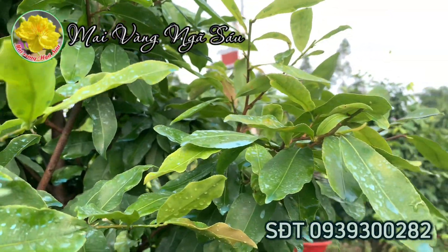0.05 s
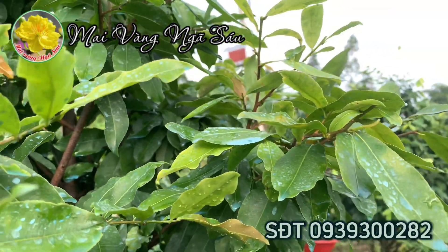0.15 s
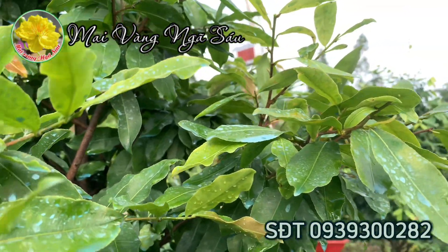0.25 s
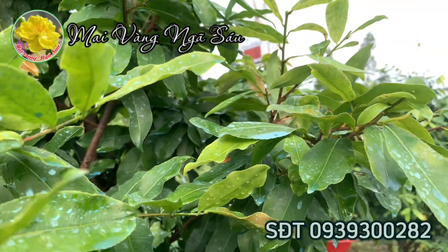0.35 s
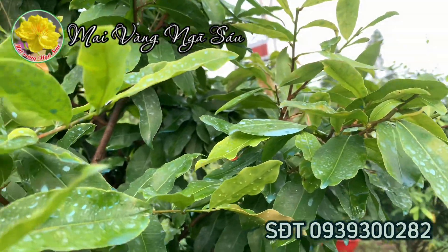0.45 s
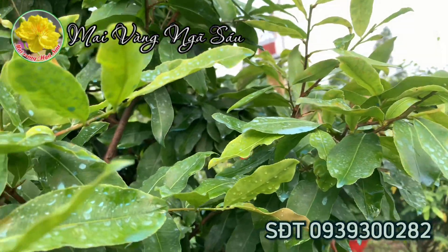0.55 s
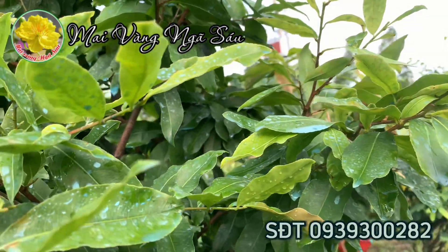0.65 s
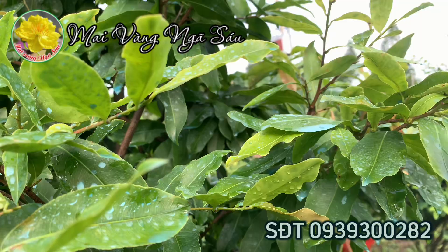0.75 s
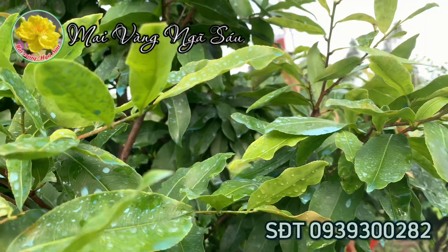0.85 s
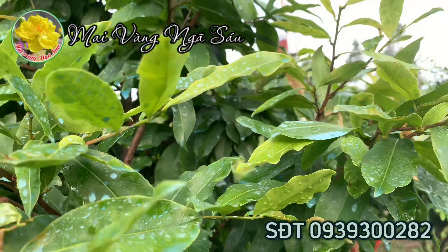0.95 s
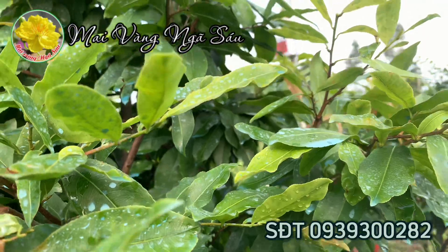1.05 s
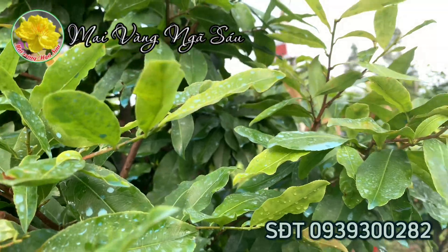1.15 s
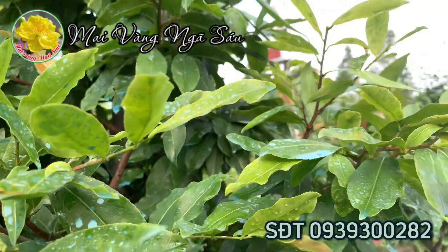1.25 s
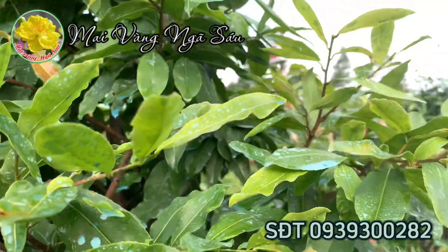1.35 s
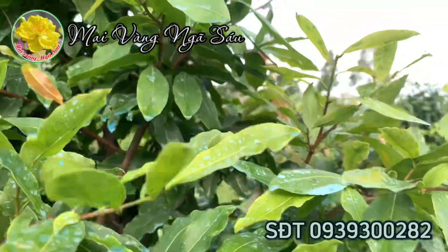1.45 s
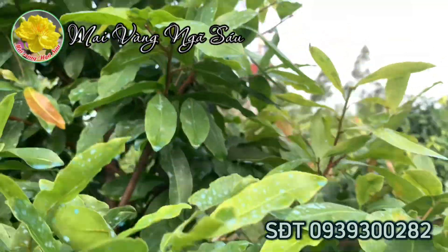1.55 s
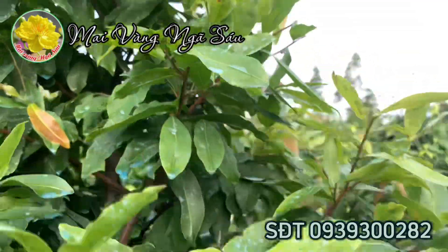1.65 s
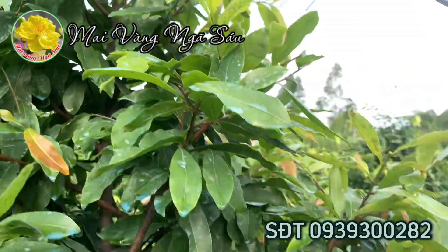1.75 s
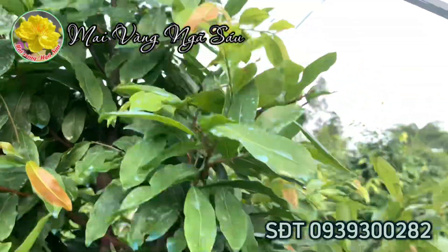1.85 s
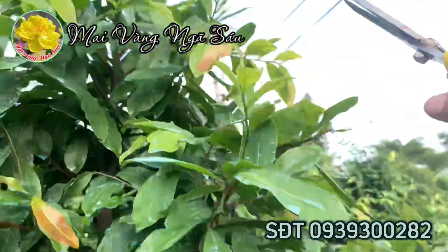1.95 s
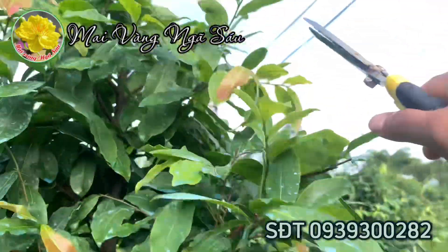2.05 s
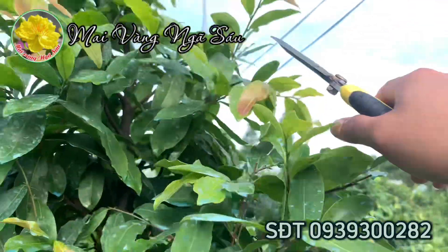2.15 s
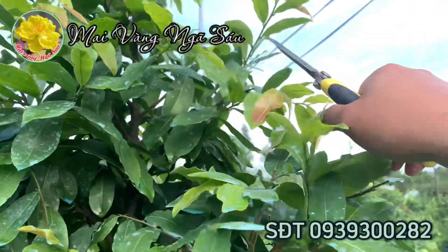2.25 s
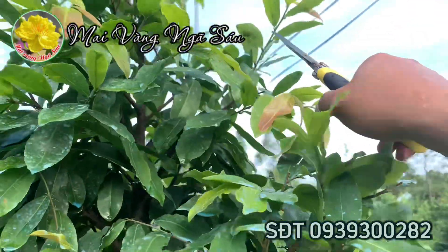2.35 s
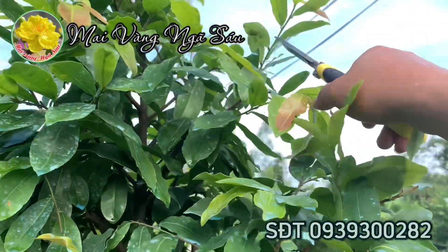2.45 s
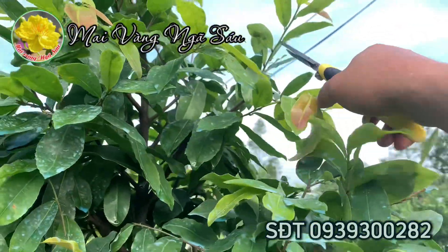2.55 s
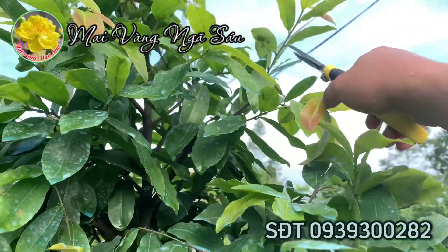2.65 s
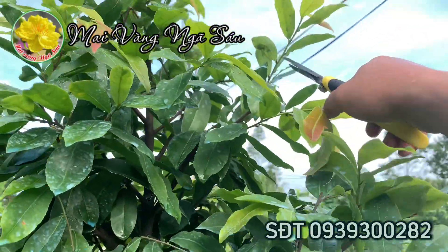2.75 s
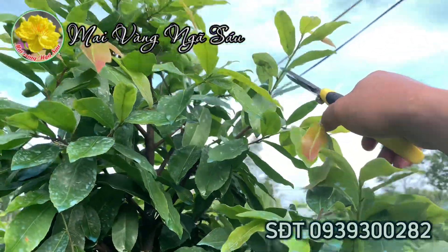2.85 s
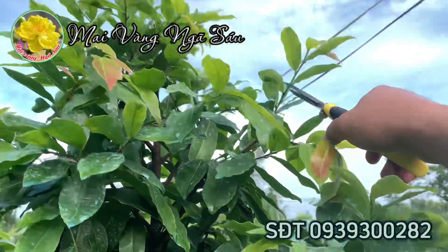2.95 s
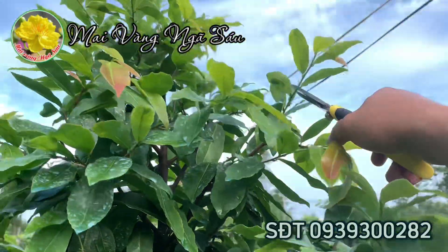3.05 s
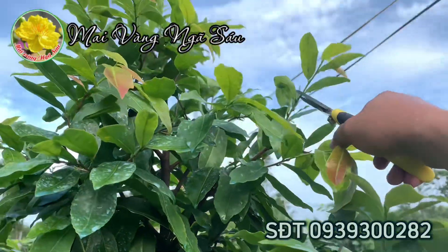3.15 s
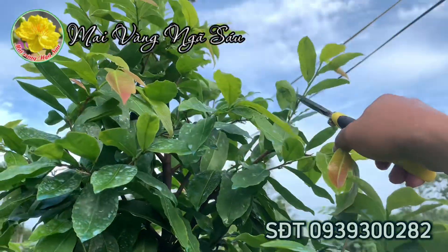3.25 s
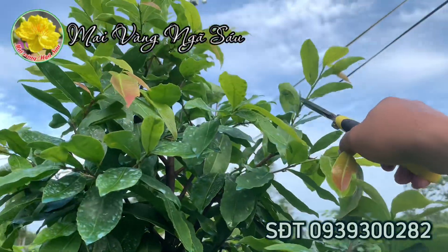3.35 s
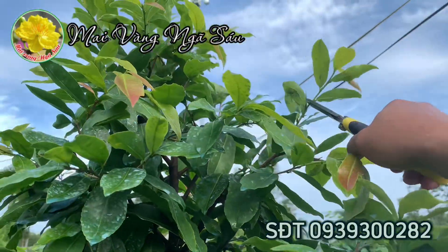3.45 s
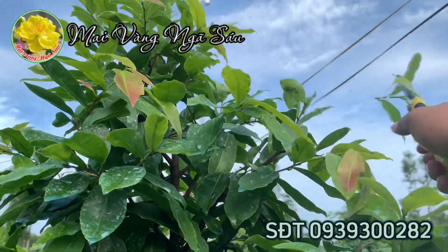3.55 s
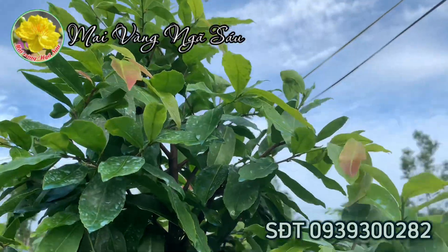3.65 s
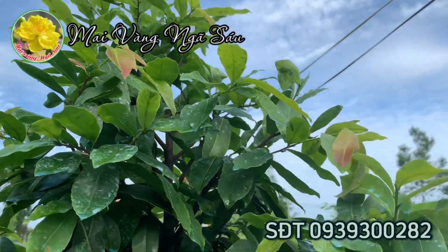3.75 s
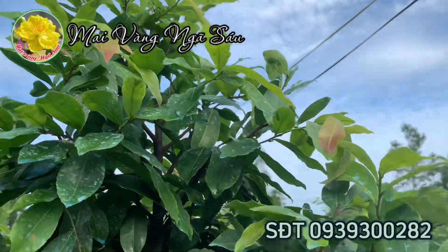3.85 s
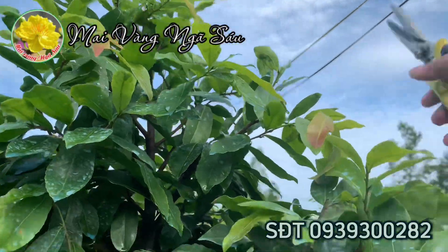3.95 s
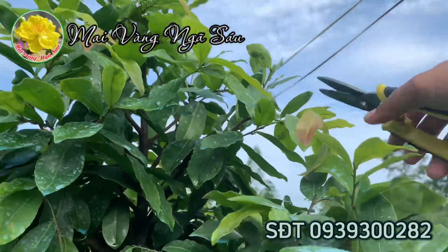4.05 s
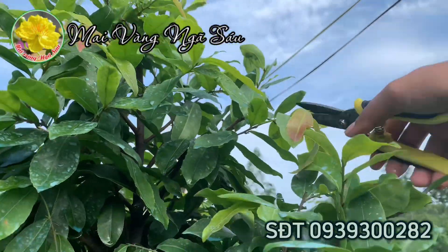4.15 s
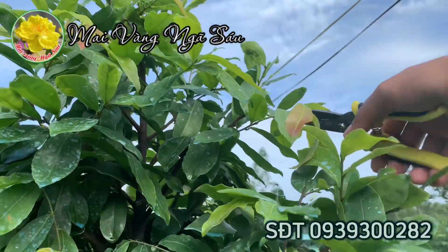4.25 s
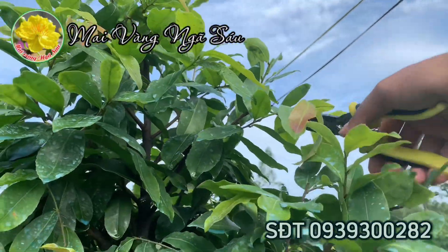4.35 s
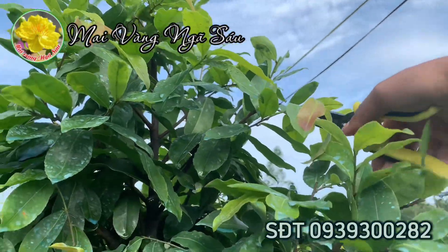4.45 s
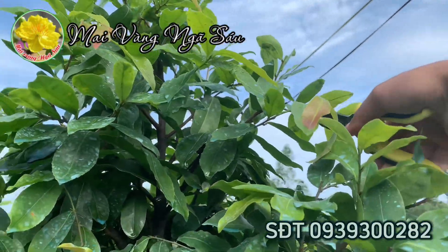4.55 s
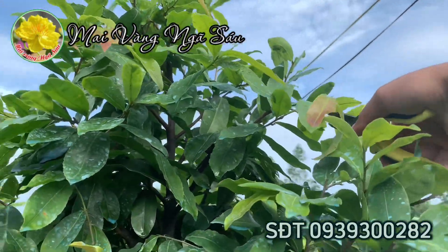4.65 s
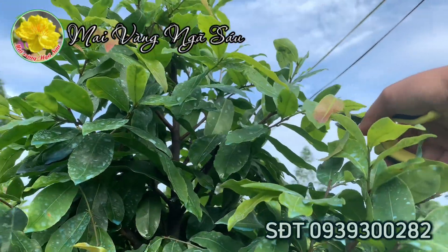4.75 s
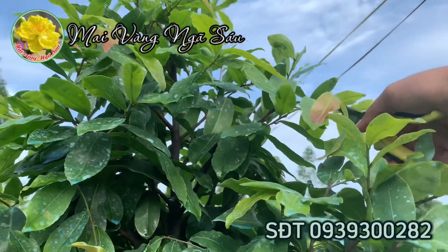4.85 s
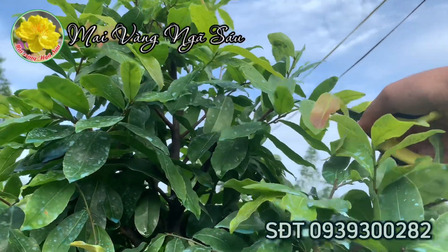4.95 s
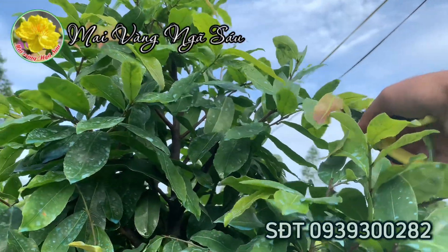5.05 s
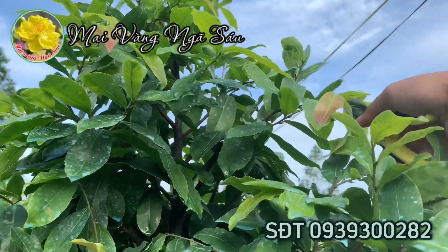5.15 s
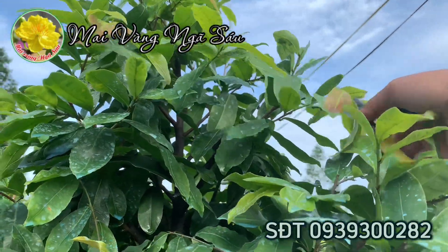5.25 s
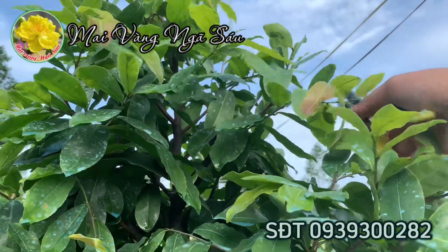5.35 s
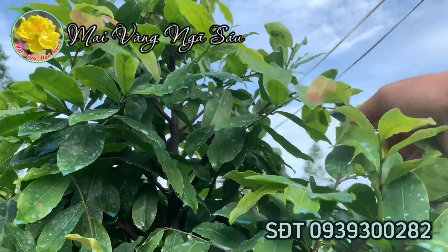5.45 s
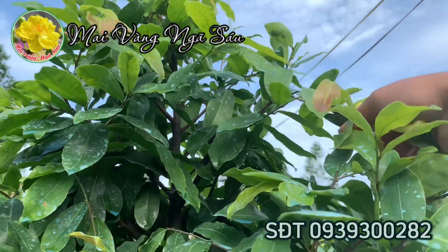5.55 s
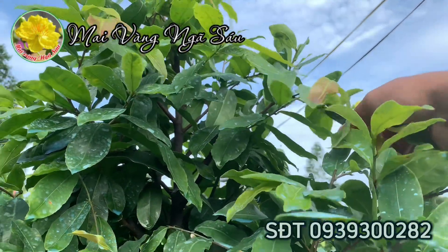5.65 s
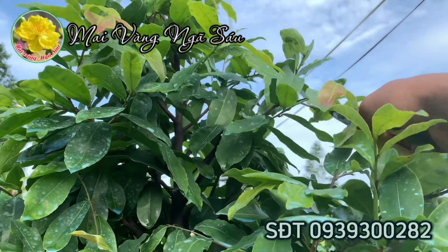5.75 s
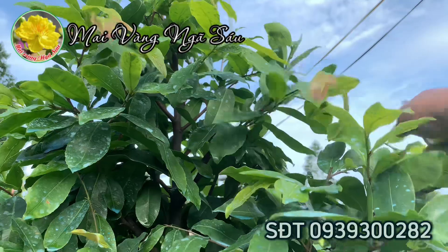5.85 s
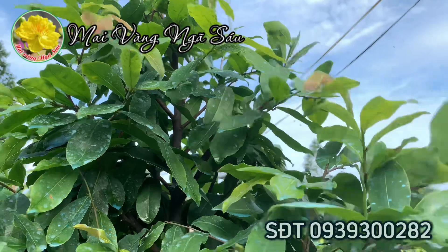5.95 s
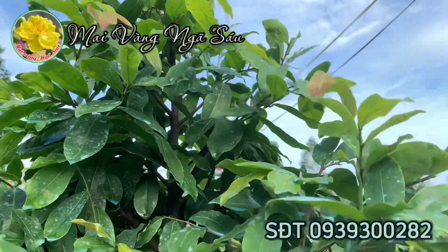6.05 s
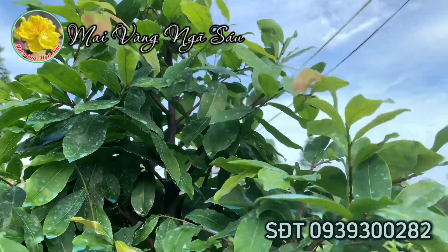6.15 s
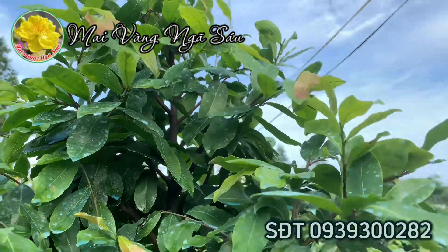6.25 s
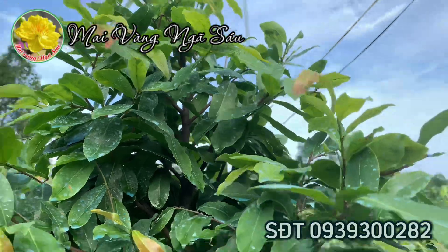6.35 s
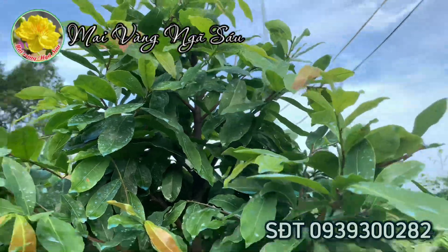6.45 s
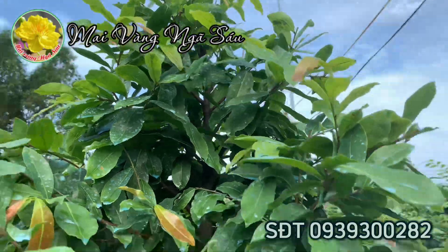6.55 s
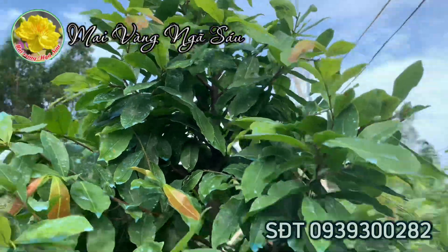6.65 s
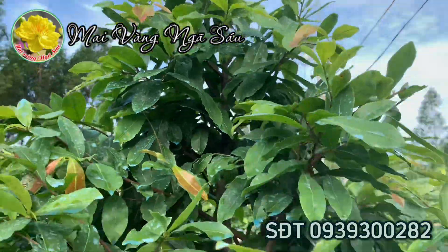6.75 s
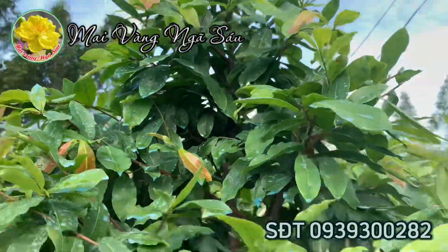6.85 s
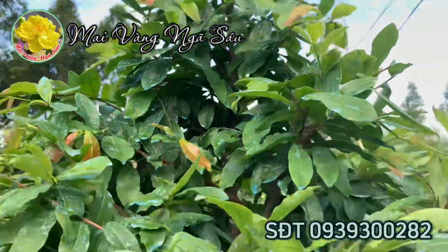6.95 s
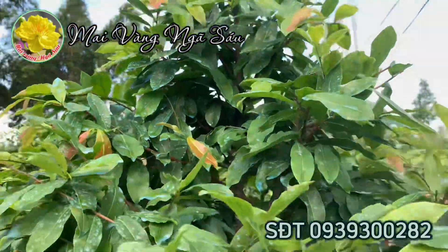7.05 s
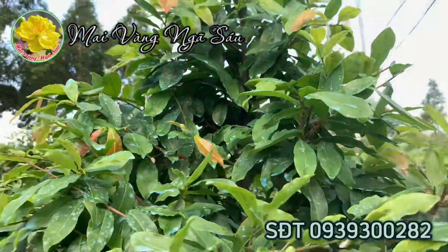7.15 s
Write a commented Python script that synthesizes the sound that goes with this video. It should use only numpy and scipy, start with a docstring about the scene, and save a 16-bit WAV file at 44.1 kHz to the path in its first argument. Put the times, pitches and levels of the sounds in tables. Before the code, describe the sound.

Outdoor garden pruning: crisp snips, rustling leaves, a hand rubbing and bumping the camera, over a steady throbbing cicada chirr and low rumble.

```python
"""Pruning scissors snip shoot tips off a garden tree, close to a hand-held camera: each cut is a set of
noise bursts for crush, snap and click, with ringing blade modes and a knock in the hand.
Leaves rustle as clumped grains; a hand rubs (stick-slip grains through case resonances) and bumps the camera.
A cicada chirrs as throbbing partials and a second insect buzzes evenly at first, over shaped noise for
far insects, air and low rumble, a faint far whine and a sinking whirr."""
import sys
import numpy as np
from scipy import signal
from scipy.fft import rfft, irfft
from scipy.io import wavfile
from scipy.ndimage import map_coordinates

SR = 44100
rng = np.random.default_rng(int(sys.argv[2]) if len(sys.argv) > 2 else 0)


def inscribe(sig):
    """Save sig as 16-bit PCM at rate SR to the path in sys.argv[1].

    A 1-D sig is mono; a 2-D sig holds one channel per row.
    Samples are clipped to [-1, 1] before scaling.
    """
    pcm = np.round(np.clip(np.atleast_2d(sig).T, -1, 1) * 32767)
    wavfile.write(sys.argv[1], SR, pcm.astype(np.int16))


N = 316638
T = np.arange(N) / SR
HZ = np.fft.rfftfreq(N, 1 / SR)


def gain_of(db):
    """Decibels to amplitude."""
    return 10 ** (np.asarray(db) / 20)


def evened(x):
    """Scales to rms 1."""
    return x / np.sqrt(np.mean(x ** 2) + 1e-20)


def read(points, hz=HZ):
    """Reads a spectrum table on a log-frequency axis."""
    f, value = np.transpose(points)
    return np.interp(np.log(hz + 1), np.log(f + 1), value)


def curve(rows, count=1):
    """One column of a time table, at every sample."""
    rows = np.asarray(rows)
    return np.interp(T, rows[:, 0], rows[:, count])


def stroke(rows):
    """Gain of a level table, silent outside its span."""
    inside = (T > rows[0][0]) * (T < rows[-1][0])
    return gain_of(curve(rows)) * inside


def swell(middle, length):
    """A rounded swell of height 1."""
    return np.exp(-2 * ((T - middle) / length) ** 2)


def gate(start, end, attack, release):
    """Attack, hold and release between two times."""
    return np.clip(np.minimum((T - start) / attack, (end - T) / release), 0, 1)


def add(mix, s, sound):
    """Mixes a sound in at time s."""
    part = mix[max(round(s * SR), 0):][:len(sound)]
    part += sound[:len(part)]


def drift(hz):
    """Slow random wander of rms 1, up to about hz."""
    return evened(irfft(rfft(rng.standard_normal(N)) / (1 + (HZ / hz) ** 4), N))


def waver(x, share, hz):
    """Lets the pitch of a steady noise wander by a small share."""
    position = np.cumsum(1 + share * drift(hz))
    return map_coordinates(x, [position], order=3, mode="wrap")


def colour(x, spectrum, size=2048):
    """Causal (minimum-phase) filter of unit energy with the given spectrum."""
    log_gain = np.log(gain_of(read(spectrum, abs(np.fft.fftfreq(size, 1 / SR)))))
    taps = np.fft.ifft(np.exp(np.conj(signal.hilbert(log_gain)))).real
    return signal.oaconvolve(x, taps / np.linalg.norm(taps))[:N]


def grains(per_s, spread_db):
    """Random tiny clicks of either sign and scattered size."""
    size = gain_of(spread_db * np.minimum(rng.exponential(1, N), 4))
    present = rng.random(N) < per_s / SR
    return evened(size * rng.choice([-1, 1], N) * present)


def burst(rise, decay, size=4096):
    """A cluster of sharp cracks: white, swelling and dying within milliseconds."""
    t = np.arange(size) / SR
    shape = (1 - np.exp(-(t / rise) ** 2)) * np.exp(-t / decay)
    x = shape * rng.standard_normal(size)
    for _ in range(3):  # every crack is sharp, so flatten the spectrum
        x = irfft(np.exp(1j * np.angle(rfft(x)))) * np.sqrt(shape)
    return evened(x) * np.sqrt(np.mean(shape ** 2))


def thud(hz, decay):
    """A soft, damp thing struck once: its wobbling phase leaves no clean pitch."""
    t = np.arange(SR // 2) / SR
    wobble = t + np.cumsum(0.097 * drift(770)[:len(t)]) / SR
    onset = 1 - np.exp(-3 * t * hz)
    return -np.sin(2 * np.pi * hz * wobble) * onset * np.exp(-t / decay)


# how alike diffuse sound is at the two ports: f/Hz, correlation/1
PORT_LIKENESS = [(60, .84), (280, .84), (700, .5), (1400, .3), (3000, .4), (6800, .55), (8200, .98)]


def diffuse(spectrum_db):
    """Noise from all around, partly alike at the two ports."""
    a, b = rfft(rng.standard_normal((2, N)))
    same = np.clip(read(PORT_LIKENESS), 0, 1)
    other = same * a + np.sqrt(1 - same ** 2) * b
    return evened(irfft(np.array([a, other]) * gain_of(spectrum_db), N))


# spectra of far insects, open air and low rumble: f/Hz, level/dB
CHORUS_SPECTRUM = [(4800, -30.5), (5400, -7.5), (5900, 0), (6450, 3), (6950, 7), (7400, 7.5), (7570, -4),
                   (7750, -54), (8500, -80.5)]
AIR_SPECTRUM = [(60, 1.5), (200, -1.5), (290, 4.5), (380, 2.5), (600, -4.5), (900, -7), (1300, -13),
                (2000, -18.5), (3200, -24.5), (5000, -25), (8000, -81.5), (15000, -50.5)]
RUMBLE_SPECTRUM = [(22, -54), (36, -20.5), (51, 4.5), (72, -2.5), (100, -1.5), (128, -2), (155, -5),
                   (185, -16), (300, -46), (1000, -90)]
# a far machine whine that comes and goes: start t/s, end t/s, level/dB
WHINE_SPELLS = [(2.04, 2.6, -67.5), (2.8, 3.4, -66), (3.66, 4.48, -66.5), (4.7, 5.15, -71),
                (6.58, 7.08, -67)]
# a faint far whirr that sinks: t/s, level/dB, f/Hz
WHIRR_PATH = [(.5, -76, 2126), (1.1, -71.5, 2035), (2.0, -72, 1762), (2.6, -73, 1775)]
CHORUS_DB, AIR_DB, RUMBLE_DB = -60, -58.5, -47.5
CHORUS_FOLLOW = 0.25  # share of the near cicada's swells (in dB) that the chorus joins in
LULL_S, LULL_LENGTH_S, AIR_LULL_DB, RUMBLE_LULL_DB = 6.14, 0.77, -8, -3.5
# the upper part of the rumble, a drone that slowly recedes
DRONE_HZ, DRONE_DB, DRONE_FADE_DB_PER_S = 100, 3, 0.87
WHINE_HZ, WHINE_WIDTH_HZ, WHINE_FADE_S, WHINE_FLOOR_DB = 1012, 15, 0.14, -79


def outdoors():
    """Shaped noise for far insects, air, rumble and a thin whine; a fluttering tone for the whirr."""
    effort_db = (curve(CICADA_LEVELS, count=1) + curve(CICADA_LEVELS, count=2)) / 2
    follow_db = CHORUS_FOLLOW * (effort_db - effort_db.mean())
    chorus = diffuse(read(CHORUS_SPECTRUM)) * gain_of(CHORUS_DB + follow_db + drift(23))

    lull = swell(LULL_S, LULL_LENGTH_S)
    air = diffuse(read(AIR_SPECTRUM)) * gain_of(AIR_DB + AIR_LULL_DB * lull + 1.44 * drift(21))
    rumble_db = RUMBLE_DB + RUMBLE_LULL_DB * lull + 0.21 * drift(3.8)
    rumble = diffuse(read(RUMBLE_SPECTRUM)) * gain_of(rumble_db)
    drone = irfft(rfft(rumble) / (1 + (DRONE_HZ / (HZ + 1)) ** 8), N)
    rumble = rumble - drone + drone * gain_of(DRONE_DB - DRONE_FADE_DB_PER_S * T)

    running = sum(gain_of(db) * gate(on, off, WHINE_FADE_S, WHINE_FADE_S) for on, off, db in WHINE_SPELLS)
    whine_band_db = -20 * np.log10(1 + ((HZ - WHINE_HZ) / WHINE_WIDTH_HZ) ** 2)
    whine = diffuse(whine_band_db) * (running + gain_of(WHINE_FLOOR_DB))

    flutter = evened(drift(40) + drift(390))
    whirr_phase = 2 * np.pi * np.cumsum(curve(WHIRR_PATH, count=2)) / SR
    whirr = stroke(WHIRR_PATH) * flutter * np.cos(whirr_phase)
    return chorus + air + rumble + whine + whirr


# leaf spectrum: f/Hz, level/dB (per Hz)
LEAF_SPECTRUM = [(500, 4), (1900, -2), (3200, -6.5), (5000, -3.5), (7000, -40), (8800, 2), (11000, 1),
                 (12800, 7), (14300, -6.5), (15000, -34)]
# brushes through the leaves, each a rounded swell: middle t/s, length/s, rustle level/dB, hiss level/dB
LEAF_BRUSHES = [(0.51, 0.13, -61, -63), (1.577, 0.17, -63.5, -69), (1.8, 0.2, -60.5, -65),
                (1.949, 0.11, -54, -59), (2.046, 0.027, -54.5, -58), (2.128, 0.2, -56.5, -57.5),
                (2.3, 0.14, -63, -60.5), (2.487, 0.17, -62, -57.5), (2.596, 0.062, -60, -60),
                (3.509, 0.081, -58, -61), (4.526, 0.33, -69, -64.5), (4.878, 0.29, -63.5, -64.5),
                (5.287, 0.07, -53.5, -60.5), (5.683, 0.016, -53, -52), (5.86, 0.21, -51, -55),
                (6.134, 1, -61, -65), (6.534, 0.26, -54.5, -65), (6.663, 0.17, -62, -63),
                (6.948, 0.087, -58, -52), (7.087, 0.38, -58, -63)]
# small ticks among leaves and blades: t/s, level/dB
SMALL_TICKS = [(4.357, -45), (4.445, -43), (4.916, -50), (5.515, -48), (6.904, -45.5), (6.9362, -52),
               (6.961, -42)]
STIR_DB = -74  # leaves stirring all the time
LEAF_SPLIT_HZ = 8400  # rustle below, hiss above


def foliage():
    """Leaves brush in clumps of fine grains, a low rustle and a high hiss; small ticks are short bursts."""
    rustle_power = hiss_power = gain_of(STIR_DB) ** 2
    for s, length, rustle_db, hiss_db in LEAF_BRUSHES:
        shape = swell(s, length)
        rustle_power = rustle_power + (gain_of(rustle_db) * shape) ** 2
        hiss_power = hiss_power + (gain_of(hiss_db) * shape) ** 2
    ticks = np.zeros(N)
    for s, db in SMALL_TICKS:
        add(ticks, s - .002, gain_of(db) * burst(rise=.0012, decay=.006))
    ticks = signal.lfilter([1, -.6], [1], ticks)  # a tick is thinner than a brush
    clumps = gain_of(2.7 * drift(23))
    brush = colour(clumps * grains(per_s=3000, spread_db=-0.5), LEAF_SPECTRUM)
    low = irfft(rfft(brush) * (HZ < LEAF_SPLIT_HZ), N)
    high = brush - low
    return colour(ticks, LEAF_SPECTRUM) + np.sqrt(rustle_power) * low + np.sqrt(hiss_power) * high


# the near cicada: t/s, 10th partial level/dB, 11th partial level/dB
CICADA_LEVELS = [(0.0, -67, -77), (0.4, -85, -64), (0.52, -63.5, -55.5), (0.82, -62, -65),
                 (1.25, -62.5, -56.5), (1.5, -63.5, -63.5), (1.67, -58, -61), (2.03, -48.5, -62),
                 (2.25, -59, -59.5), (2.55, -55, -58.5), (3.15, -58, -69.5), (3.6, -52, -53),
                 (3.88, -53, -50), (4.08, -59.5, -56), (4.45, -59, -65.5), (4.8, -61, -63),
                 (5.48, -55, -68.5), (5.72, -61, -63), (6.08, -52, -60), (6.35, -56, -56.5),
                 (6.6, -55.5, -51), (6.7, -58.5, -65.5), (6.87, -53, -64), (7.18, -63, -59.5)]
# click rate of its tymbal: t/s, f/Hz
TYMBAL_RATE = [(0, 596.3), (2, 606.5), (4.5, 607.8), (7.18, 610.7)]
# its weaker partials: multiple of the click rate/1, level/dB (re the 10th if below it, else the 11th)
WEAK_PARTIALS = [(9, -17.5), (12, -19.5), (15, -23), (16, -22.5), (17, -18)]
# its lowest partial comes forward: middle t/s, length/s, added level/dB
FORWARD_SWELLS = [(0.715, 0.2, 10), (2.172, 0.12, 12)]
WAVER_DB, WAVER_HZ = 0.9, 7


def cicada(throb_hz=23.46, swing=0.0035, throb_db=3.0):
    """Tymbal clicks merge into partials; their rate throbs, and their strength follows a quarter cycle later."""
    beat = 2 * np.pi * np.cumsum(throb_hz * (1 + 0.0465 * drift(5.66))) / SR
    rate_sway = 1 + swing * np.cos(beat) + 0.0012 * drift(104) + .001 * drift(4.97)
    phase = 2 * np.pi * np.cumsum(curve(TYMBAL_RATE) * rate_sway) / SR
    low_db, high_db = (curve(CICADA_LEVELS, count=k) + WAVER_DB * drift(WAVER_HZ) for k in (1, 2))
    song = gain_of(low_db) * np.cos(10 * phase) + gain_of(high_db) * np.cos(11 * phase)
    forward_db = sum(db * swell(s, length) for s, length, db in FORWARD_SWELLS)
    for k, db in WEAK_PARTIALS:
        main_db = low_db + forward_db if k < 10 else high_db
        song += gain_of(db + main_db) * np.cos(k * phase)
    depth_db = throb_db * (1 + .3 * drift(4))
    return np.sqrt(2) * song * gain_of(depth_db * np.sin(beat) + .9 * drift(50))


# the small body that shapes the second insect's pulses: f/Hz, level/dB
BUZZ_SPECTRUM = [(3200, -42), (3750, -30), (4250, -40), (5200, -33), (5430, -9), (5590, -21), (5750, -11),
                 (6050, -2), (6350, -6), (6520, -1), (6800, -4), (7100, -8), (8000, -45), (9600, -34),
                 (10100, -9), (10500, -36)]
# it holds its level, then dies away
BUZZ_DB, BUZZ_HOLD_S, BUZZ_FADE_DB_PER_S, BUZZ_END_S, BUZZ_RELEASE_S = -52.5, 0.23, 16, 0.68, 0.11
# its resonance glides up
BUZZ_RING_HZ, BUZZ_GLIDE_HZ_PER_S, BUZZ_RING_WIDTH_HZ, BUZZ_RING_DB = 5800, 2300, 380, 7


def buzzer():
    """Harmonics of an even pulse rate ring a small insect body."""
    pulse_hz = 150.95
    turns = np.cumsum(pulse_hz * (1 + 0.00032 * drift(4.1))) / SR
    sounding = T < BUZZ_END_S
    orders = np.arange(20, 86)
    # each harmonic starts at a random phase
    partials = np.cos(2 * np.pi * orders * (turns[sounding, None] + rng.random(len(orders))))
    ring_hz = BUZZ_RING_HZ + BUZZ_GLIDE_HZ_PER_S * T[sounding, None]
    offset = (orders * pulse_hz - ring_hz) / BUZZ_RING_WIDTH_HZ
    ring = gain_of(BUZZ_RING_DB / (1 + offset ** 2))
    song = np.zeros(N)
    song[sounding] = evened((partials * ring) @ gain_of(read(BUZZ_SPECTRUM, orders * pulse_hz)))
    release = np.clip((BUZZ_END_S - T) / BUZZ_RELEASE_S, 0, 1)
    return song * release * gain_of(BUZZ_DB - BUZZ_FADE_DB_PER_S * np.maximum(T - BUZZ_HOLD_S, 0))


# two grainy low overtones of the buzzing insect: f/Hz, level/dB
RASP_TONES = [(3400, -71), (3900, -70)]
RASP_END_S = 0.31


def rasp():
    """Two tones roughened in level and pitch: low overtones of the buzzing insect, which die first."""
    bands = np.zeros(N)
    for hz, db in RASP_TONES:
        roughness = evened(1 + drift(30))
        phase = 2 * np.pi * np.cumsum(hz + 20 * drift(140)) / SR
        bands += gain_of(db) * roughness * np.cos(phase)
    return bands * np.sqrt(np.clip(1 - T / RASP_END_S, 0, 1))


# modes of the scissors: f/Hz, struck level/dB, scraped level/dB, t60/s
BLADE_MODES = [(1090, -15.5, 0, 0.031), (1580, 2, -30, 0.012), (2464, -1.5, -2.5, 0.018),
               (4180, -7, 0, 0.02), (5020, -6, 3, 0.018), (5440, -14, -11, 0.056)]


def blades(x, scraped=False):
    """The ring of the scissors; a blow and a scrape favour different modes."""
    t = np.arange(SR // 8) / SR
    ring = np.zeros(len(t))
    for hz, blow_db, scrape_db, t60 in BLADE_MODES:
        mode_db = scrape_db if scraped else blow_db
        ring += gain_of(mode_db - 60 * t / t60) * np.sin(2 * np.pi * hz * t)
    return signal.oaconvolve(x, ring / np.linalg.norm(ring))[:N]


# the cuts: t/s, stem snap level/dB, steel click level/dB, crush level/dB, crush lead/s (3.5 ms is added),
# hand knock level/dB, knock f/Hz, blade clack level/dB, stem pitch factor/1 (thinner is higher),
# snap decay/s, click decay/s
SNIPS = [(0.4804, -34, -35.5, -44, 0.0034, -43, 557, -26, 1.17, 0.0025, 0.0067),
         (3.4687, -6, -9.5, -30, 0.0022, -39, 362, -27, 1.03, 0.0013, 0.0018),
         (5.778, -27, -11.5, -31.5, 0.0058, -31.5, 230, -13, 1.04, 0.0013, 0.0012)]
# spectra of stem and steel: f/Hz, level/dB
STEM_SPECTRUM = [(200, -8), (1000, -27.5), (1530, -22), (1950, -3), (2800, 3), (3500, -2.5), (4200, 3),
                 (5300, 3.5), (6100, -27), (7000, -4), (8600, -1), (15000, -58.5)]
STEEL_SPECTRUM = [(1000, -31), (1600, -15), (3400, -17), (4900, -10.5), (7900, -9), (8700, -35),
                  (10000, -0.5), (11300, -6.5), (12500, 3.5), (14300, -4), (15500, -31)]
# the blades chink as they part or graze a twig: t/s, level/dB
BLADE_CHINKS = [(0.548, -60), (2.528, -52), (2.697, -59.5), (2.599, -57), (3.514, -50.5), (4.759, -53.5),
                (5.345, -50.5), (5.978, -45.5)]
CRUSH_STEEL_DB, CHATTER_DB = 9.5, -9  # steel scraping re the crush, chatter re the click
TEAR_DB, KNOCK_CYCLES = -19, 1.13  # last fibres tearing, re the snap; decay of the knock
CHINK_STEEL_DB, CHINK_RING_DB = 7, -1.5  # bright edge and ring of a chink


def scissors():
    """The blades crush the fibres, snap through, click shut and chink apart; foliage scatters the sound."""
    stem, steel, knock, shock, chink = np.zeros((5, N))
    for (s, snap_db, click_db, crush_db, lead, knock_db, knock_hz, clack_db,
         pitch, snap_s, click_s) in SNIPS:
        shoot = [(hz * pitch, db) for hz, db in STEM_SPECTRUM]
        bite = s - lead - .0035
        crush = colour(burst(rise=0.0023, decay=0.0034), shoot)
        add(stem, bite, gain_of(crush_db) * crush)
        add(steel, bite, gain_of(crush_db + CRUSH_STEEL_DB) * burst(rise=0.002, decay=0.005))
        snap = colour(burst(rise=.0009, decay=snap_s), shoot)
        add(stem, s - .0005, gain_of(snap_db) * snap)
        tear = colour(burst(rise=0.0032, decay=0.002), shoot)
        add(stem, s + 0.001005, gain_of(snap_db + TEAR_DB) * tear)
        add(steel, s + .0005, gain_of(click_db) * burst(rise=.0003, decay=click_s))
        add(steel, s, gain_of(click_db + CHATTER_DB) * burst(rise=.004, decay=.005))
        for at in (bite, s):  # the hand is jolted as the blades bite and as they meet
            add(knock, at, gain_of(knock_db) * thud(knock_hz, KNOCK_CYCLES / knock_hz))
        add(shock, s + .0005, [gain_of(clack_db)])
    for s, db in BLADE_CHINKS:
        add(chink, s - .002, gain_of(db) * burst(rise=0.002, decay=0.0059))
    stem = stem + colour(chink, STEM_SPECTRUM)
    steel = colour(steel + gain_of(CHINK_STEEL_DB) * chink, STEEL_SPECTRUM)
    direct = stem + steel + blades(shock + gain_of(CHINK_RING_DB) * chink)
    scatter = [signal.oaconvolve(direct, burst(rise=.004, decay=.03))[:N] for _ in range(2)]
    return direct + knock + gain_of(-49) * np.array(scatter)


def tap(hz):
    """A soft tap: a short burst around one broad resonance."""
    resonance = [(hz / 10, -24), (hz, 0), (hz * np.sqrt(2), -18), (hz * 10, -60)]
    return colour(burst(rise=.004, decay=.012), resonance)


# a hand rubs on the camera, pressing harder or easing off: t/s, length/s, level/dB, change of level/dB
HAND_RUBS = [(4.789, 0.23, -49, 11.5), (5.122, 0.039, -42, 10), (5.155, 0.11, -39.5, -8),
             (5.238, 0.18, -42, 6.5), (5.386, 0.081, -43, 8), (5.858, 0.118, -46.5, 4)]
# resonances of the camera case: f/Hz, width/Hz, level/dB
CASE_MODES = [(274, 24, -17), (388, 72, -10), (480, 85, -7.5), (685, 110, -12), (789.6, 25, -9),
              (982, 210, -13)]
# soft bumps of the grip: t/s, level/dB, f/Hz, decay/s
GRIP_BUMPS = [(0.899, -28.5, 53.5, 0.064), (1.129, -34, 59.8, 0.089), (1.807, -19.5, 65, 0.0076),
              (5.438, -28.5, 125, 0.022), (5.898, -29.5, 105.4, 0.015), (6.645, -34, 57.5, 0.11)]
# fingers knocking on the camera case: t/s, level/dB
FINGER_KNOCKS = [(4.81, -43.5), (4.971, -37), (5.166, -28.5)]
# soft taps on the camera case or nearby twigs: t/s, level/dB, resonance f/Hz
SOFT_TAPS = [(1.931, -54, 2110), (5.084, -59, 4500), (5.137, -42, 790), (5.875, -52, 860),
             (5.924, -41.5, 1050), (5.951, -49, 1050), (6.839, -47.5, 1360), (7.06, -47.5, 1620)]
RUB_EDGE_S, SLIP_HZ, SLIP_DB = 0.017, 34.8, 1.8
KNOCK_HZ, KNOCK_DECAY_S = 404.4, 0.019


def handling(edge_hz=1200, brighten=0.78):
    """Skin sticks and slips on the camera case; shifts of grip bump it, with knocks and soft taps."""
    shared, left, right = (grains(per_s=380, spread_db=3.5) for _ in range(3))
    slips = rfft(shared + 0.99 * np.array([left, right])) / (1 + (HZ / edge_hz) ** 8)
    force = np.zeros(N)
    for s, length, db, press_db in HAND_RUBS:
        press = press_db * np.clip((T - s) / length - .5, -1, 1)
        force += gate(s, s + length, RUB_EDGE_S, RUB_EDGE_S) * gain_of(db + press)
    force = force * gain_of(SLIP_DB * drift(SLIP_HZ)) + 1e-9
    rub = np.zeros((2, N))
    for hz, width, db in CASE_MODES:
        resonance = 1 / (1 + 2j * (HZ - hz) / width) / (1 + ((HZ - hz) / (3 * width)) ** 2)
        ring = evened(irfft(slips * resonance, N))
        # harder slips bring out the higher resonances
        brightness = (force / force.max()) ** (brighten * max(np.log2(hz / 500), 0))
        rub += gain_of(db) * ring * force * brightness
    hits = np.zeros(N)
    for s, db, hz, decay in GRIP_BUMPS:
        add(hits, s, gain_of(db) * thud(hz, decay))
    for s, db in FINGER_KNOCKS:
        add(hits, s, gain_of(db) * thud(KNOCK_HZ, KNOCK_DECAY_S))
    for s, db, hz in SOFT_TAPS:
        add(hits, s, gain_of(db) * tap(hz))
    return rub + hits


# before the last cut the blades slide shut slowly, and press harder as they bite
SLIDE_S, SLIDE_RISE_S, SLIDE_DB, BITE_DB, BITE_S = 0.62, 0.3, -60, 18.5, 0.019


def slide():
    """Steel slides on steel before the last cut; its ring wanders as the contact point travels."""
    scrape = grains(per_s=3000, spread_db=0)
    shut = SNIPS[-1][0]
    bite_db = BITE_DB * np.exp(-abs(T - shut) / BITE_S)
    pressure = gate(shut - SLIDE_S, shut, SLIDE_RISE_S, 0.0046) * gain_of(SLIDE_DB + bite_db)
    ring = waver(blades(scrape, scraped=True), share=.012, hz=7)
    ring = waver(ring, share=.005, hz=90)
    return pressure * evened(ring + .5 * colour(scrape, STEM_SPECTRUM))


def scene():
    """All sources at the two ports."""
    insects = cicada() + buzzer() + rasp()
    return outdoors() + foliage() + insects + scissors() + handling() + slide()


# the two microphone ports: f/Hz, phase/rad by which left leads
PORT_LEAD = [(50, 0), (350, -.1), (800, -1.2), (1800, -.5), (4200, -.5), (5500, -1.7), (6500, -1.2),
             (7700, -2.2), (8700, -3.14), (11000, -6.28), (13500, -9.42), (15000, -11.5)]
# f/Hz, level/dB of left minus right
PORT_LEVEL = [(200, -1), (700, 2), (2400, -1.5), (4200, -4), (5500, -8), (6100, -6), (6800, -0.5),
              (8200, -0.5)]
EDGE_HZ = 15400  # upper band limit


def record(dry):
    """The ports differ in phase and level; then the band limit."""
    half = np.exp(.5j * read(PORT_LEAD)) * gain_of(read(PORT_LEVEL) / 2)
    ports = irfft(rfft(dry) * np.array([half, 1 / half]), N)
    lowpass = signal.firwin(255, EDGE_HZ, window=("kaiser", 9), fs=SR)
    return signal.oaconvolve(ports, lowpass[None], "same")


dry = scene()
out = record(dry)
inscribe(out)
```